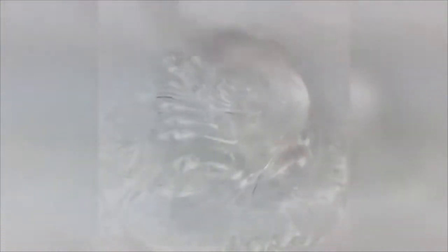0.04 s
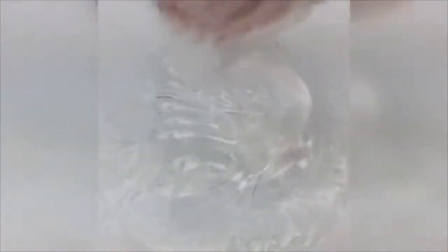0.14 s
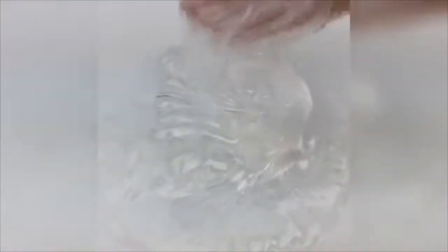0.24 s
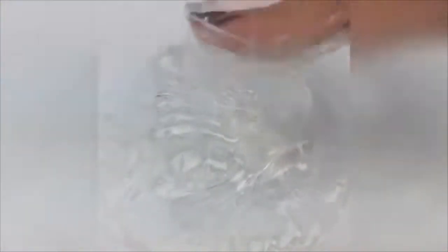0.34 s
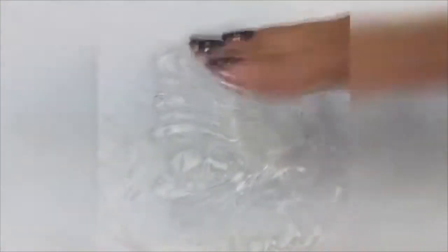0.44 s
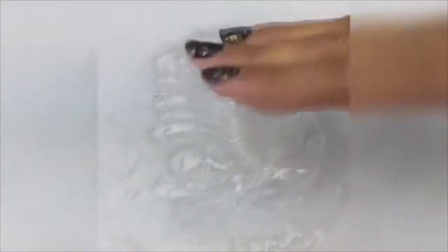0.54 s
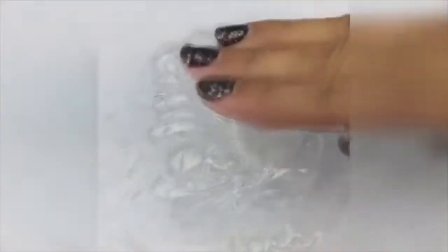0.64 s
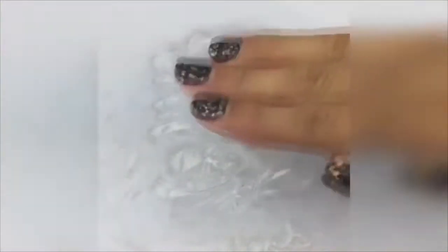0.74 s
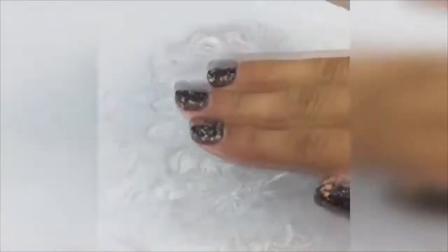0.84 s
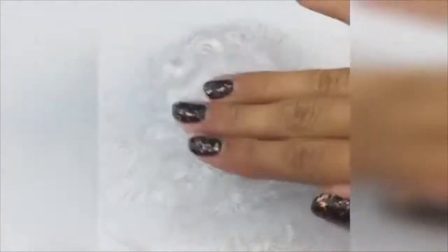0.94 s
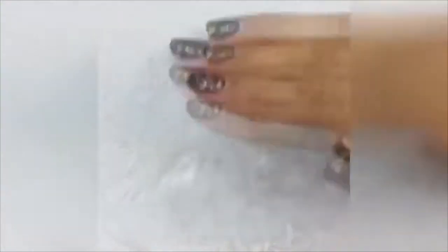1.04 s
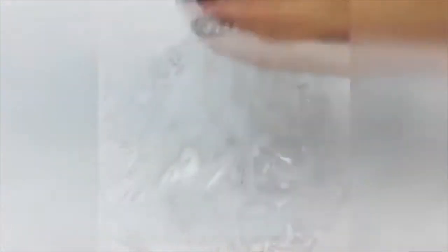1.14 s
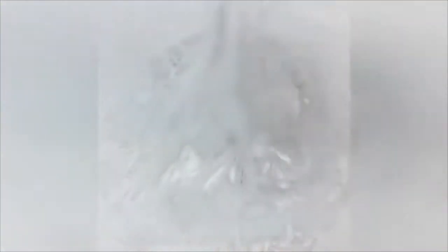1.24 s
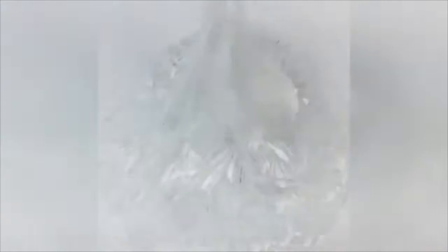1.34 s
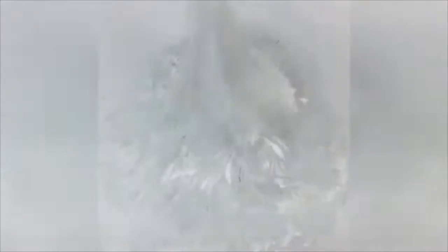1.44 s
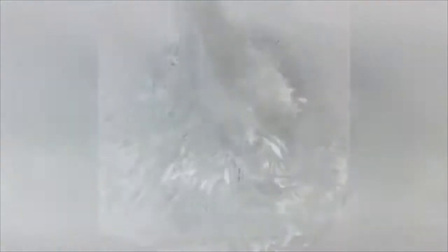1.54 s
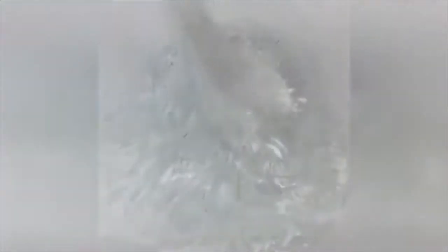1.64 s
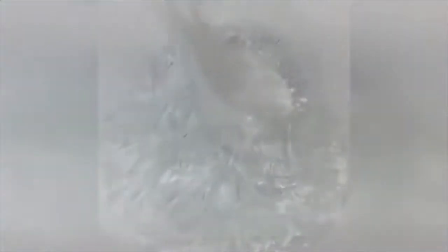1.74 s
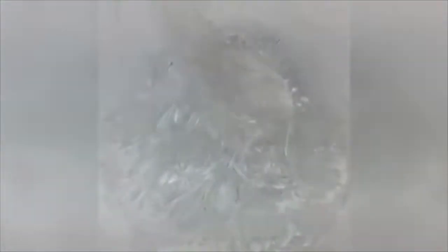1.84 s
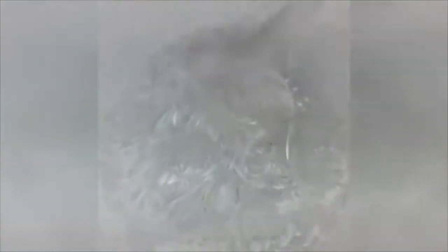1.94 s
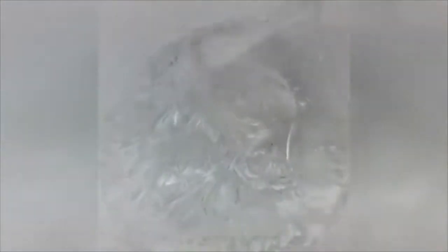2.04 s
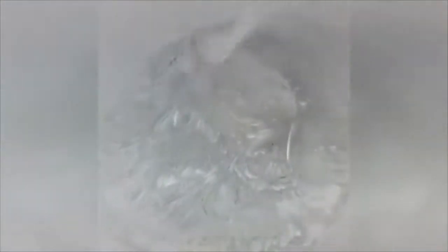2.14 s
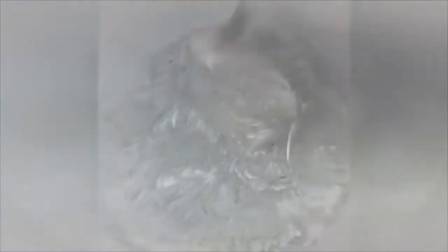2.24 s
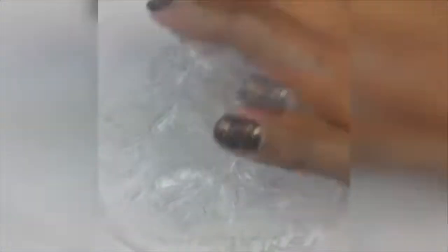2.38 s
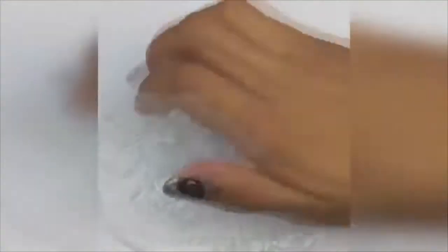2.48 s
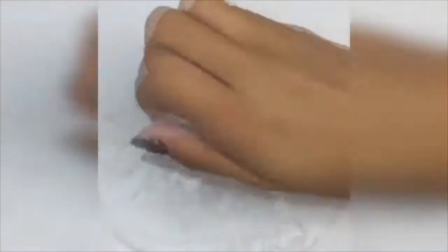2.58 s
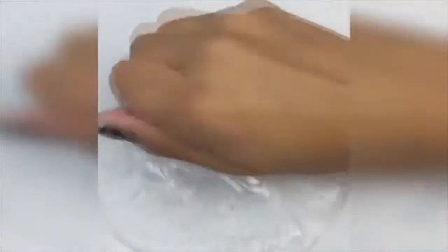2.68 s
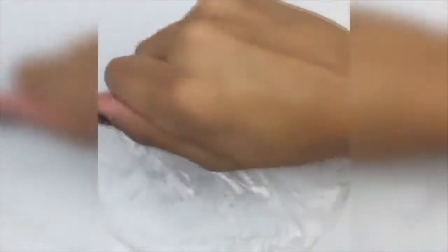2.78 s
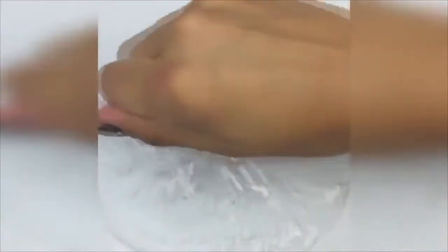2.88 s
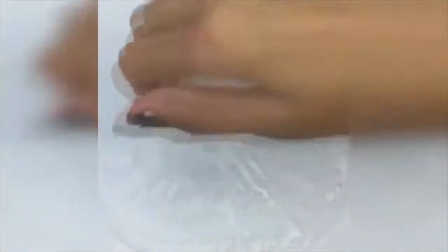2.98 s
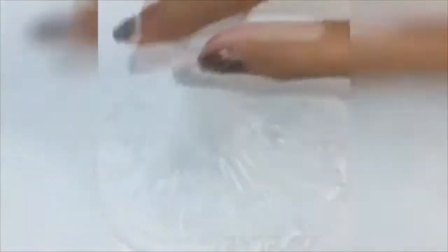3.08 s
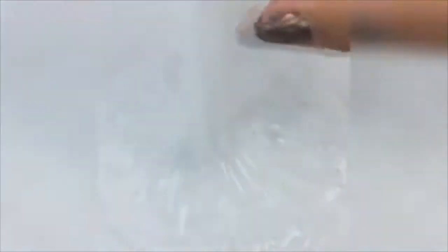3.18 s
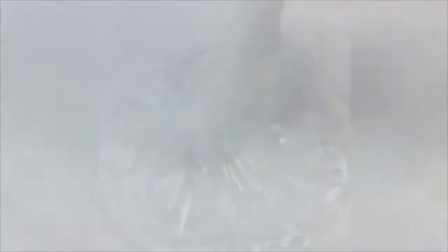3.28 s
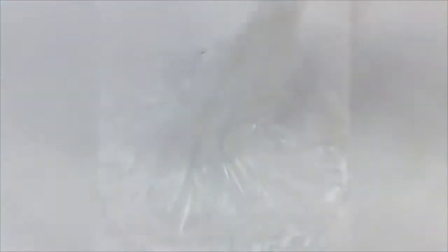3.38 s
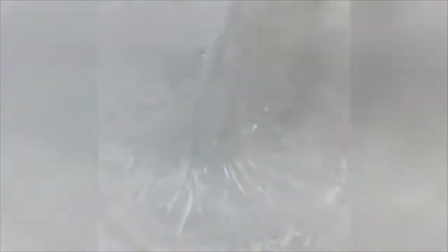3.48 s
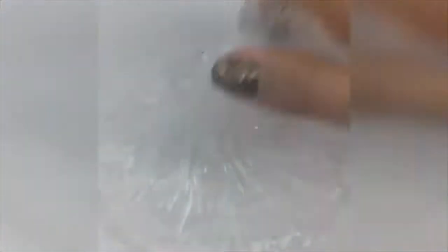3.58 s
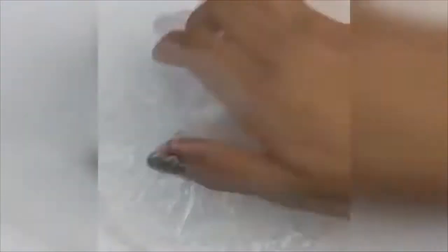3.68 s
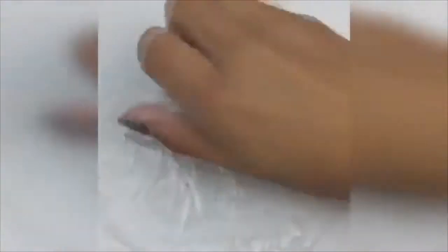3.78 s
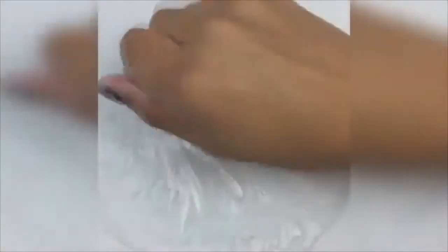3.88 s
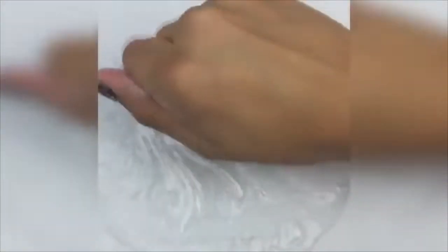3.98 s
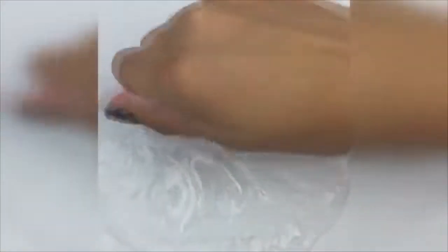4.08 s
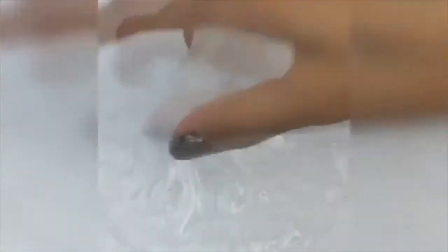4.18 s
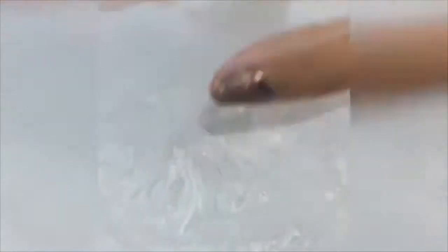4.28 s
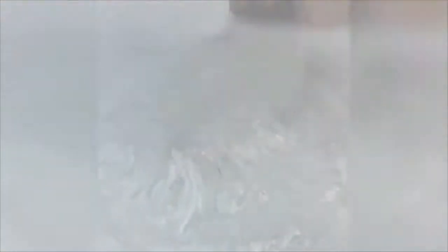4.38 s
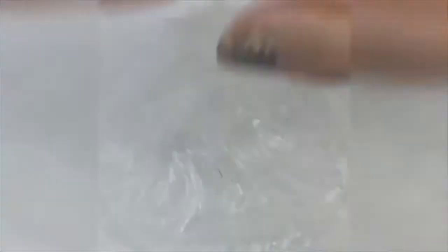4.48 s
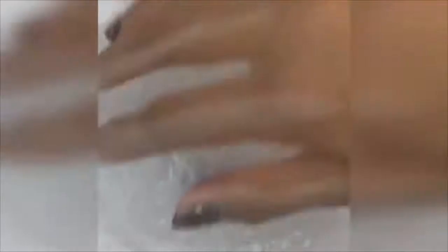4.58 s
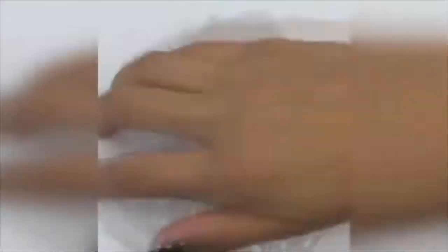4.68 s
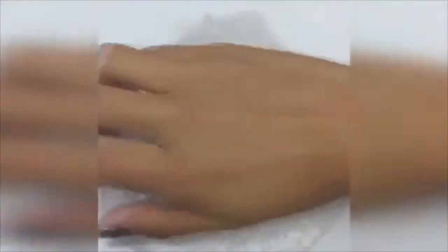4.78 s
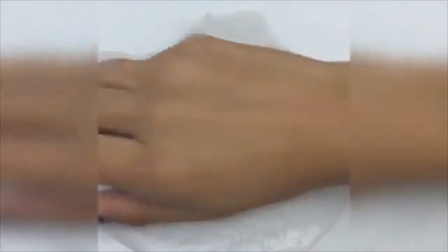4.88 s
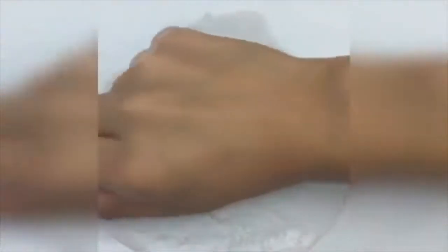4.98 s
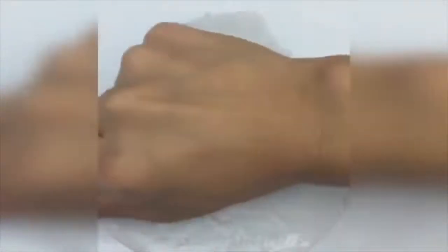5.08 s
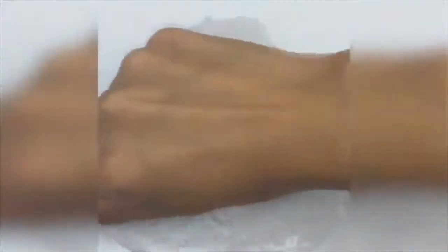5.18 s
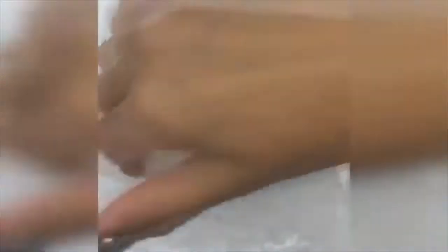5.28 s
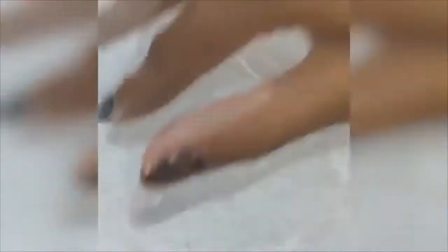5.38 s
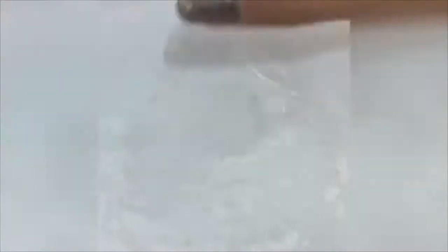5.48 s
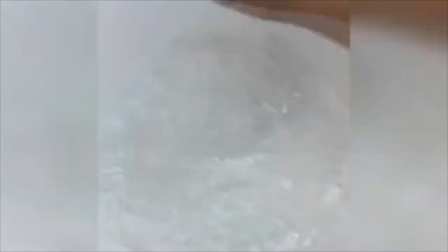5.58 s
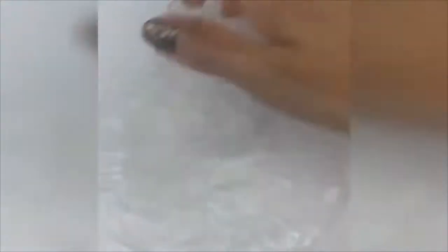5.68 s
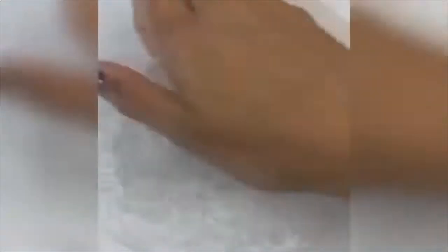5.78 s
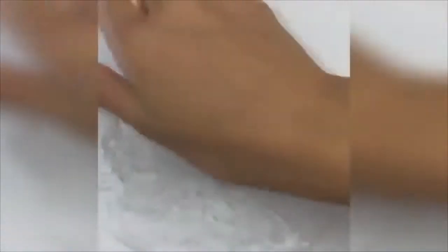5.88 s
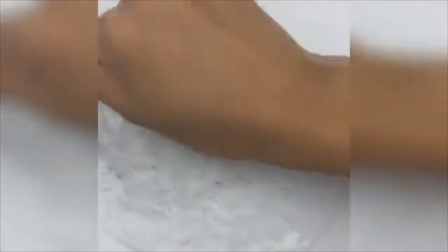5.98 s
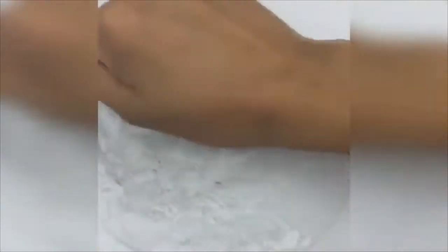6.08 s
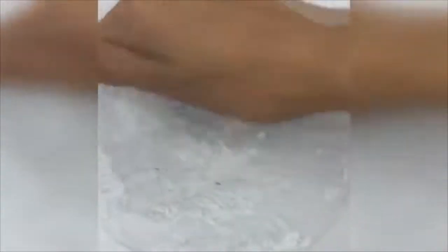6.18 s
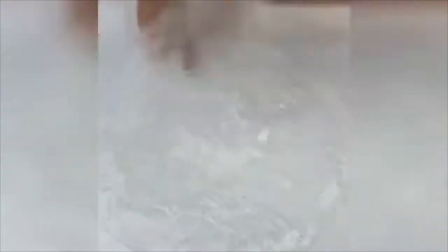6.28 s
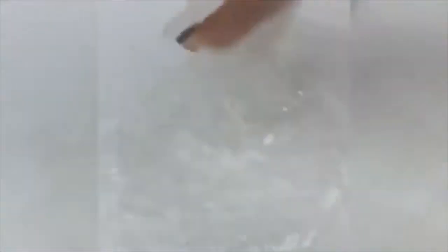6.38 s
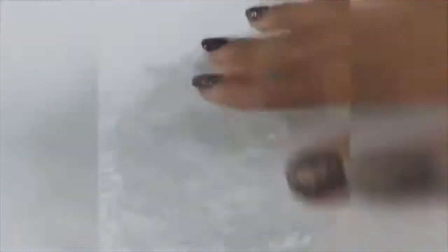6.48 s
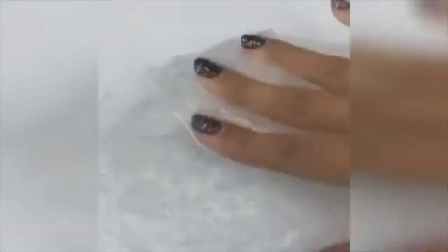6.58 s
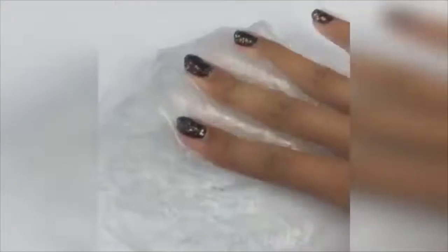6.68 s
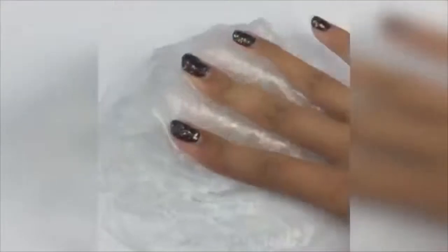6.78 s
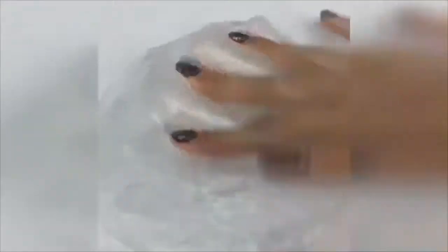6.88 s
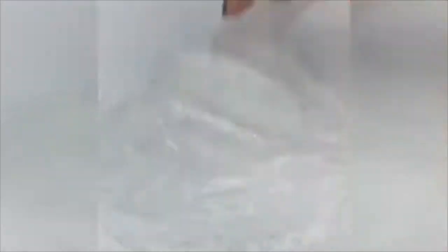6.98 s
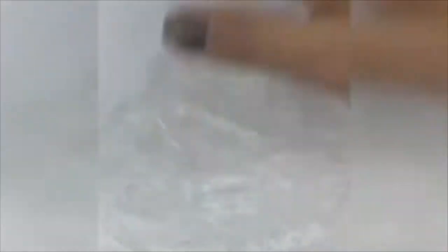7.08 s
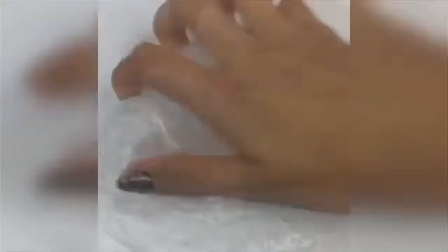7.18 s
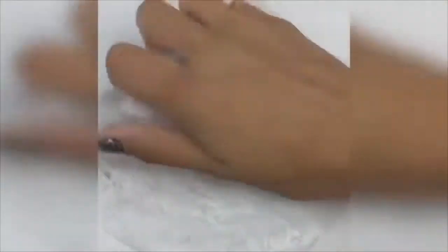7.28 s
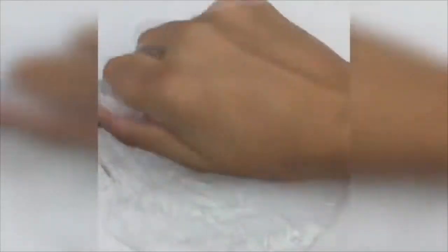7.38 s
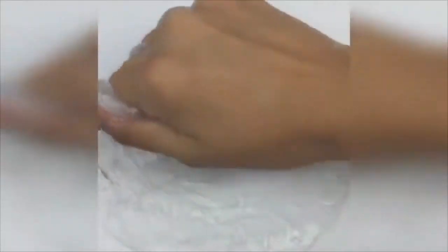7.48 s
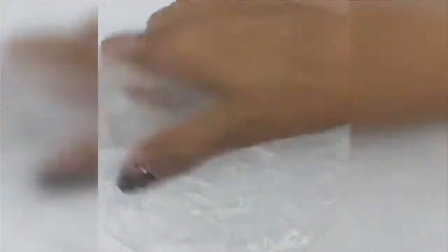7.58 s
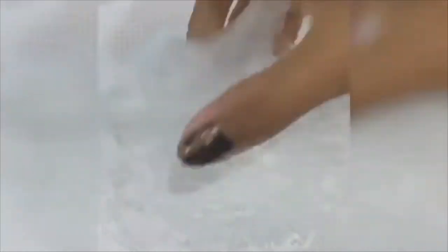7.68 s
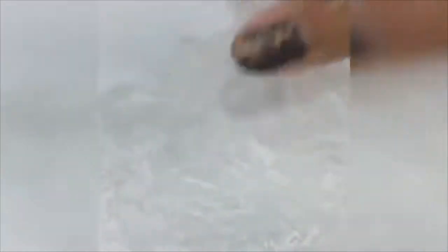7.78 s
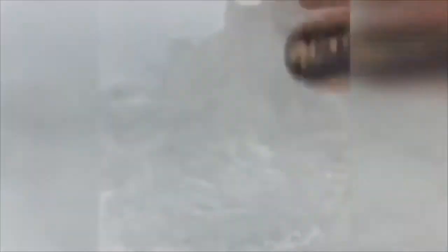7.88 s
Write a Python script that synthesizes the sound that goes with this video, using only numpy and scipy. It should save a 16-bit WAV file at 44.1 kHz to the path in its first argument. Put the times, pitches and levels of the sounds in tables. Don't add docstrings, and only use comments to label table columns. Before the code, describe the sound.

Very close to a phone microphone in a small quiet room, hands work wet slime. It begins almost silent with low hum and tiny ticks, then a sudden cluster of sharp pops and dense sticky crackle breaks out near three seconds. Further uneven bursts follow, with brief gulps, squelches and soft low table booms, ending with one loud ringing pop and fading crackle.

```python
import sys
import numpy as np
from scipy import signal
from scipy.io import wavfile
from scipy.ndimage import uniform_filter1d

SR = 44100
rng = np.random.default_rng(int(sys.argv[2]) if len(sys.argv) > 2 else 0)


def magnitude_from_level(level_db):
    exponent = np.asarray(level_db, float) / 20
    return 10 ** exponent


def wrap_up_sound(samples):
    columns = np.atleast_2d(samples).T
    tamed = np.clip(columns, -1, 1)
    steps = np.round(tamed * 32767).astype(np.int16)
    wavfile.write(sys.argv[1], SR, steps)


N = 349838

# (pitch [Hz], level [dB])
HUM_COLOUR = [(12, -68), (20, -39), (43, -10), (62, -8), (87, -10.5), (124, 0), (164, -12), (205, -12.5),
              (377, -21.5), (409, -25.5), (587, -28.5), (1930, -31.5), (2690, -31.5), (12700, -39.5),
              (15000, -48)]
# (time [s], level [dB], pitch [Hz])
BLISTERS = [(0.048, -42.5, 3200), (0.711, -57, 4000), (1.2695, -42, 870), (1.3284, -48, 3150),
            (1.37, -42, 2150), (1.3864, -46, 4570), (1.4192, -45, 1860), (1.4372, -43.5, 3800),
            (1.628, -52, 6300), (1.7182, -52.5, 8600), (1.82, -55, 9100), (1.8504, -51, 7800),
            (1.8752, -44.5, 8700), (1.9017, -47, 10100), (2.4339, -60, 8000), (2.5085, -57, 8540),
            (2.661, -54.5, 990), (2.6872, -41.5, 5250), (3.382, -39.5, 2390), (3.567, -41.5, 6000),
            (3.6178, -47, 11880), (3.896, -43.5, 1950), (4.9035, -48, 6260), (5.0387, -54, 2420),
            (6.5737, -46, 10940), (6.7658, -46.5, 9900), (6.7923, -53.5, 662), (6.8437, -51.5, 3950),
            (6.9277, -43, 2020), (7.235, -48.5, 4130), (2.55, -59.5, 6000), (2.728, -49, 8000),
            (2.787, -43, 11000), (2.7995, -35, 9000), (2.856, -31.5, 10960), (4.118, -30.5, 1240),
            (4.185, -43, 11000), (4.2055, -40, 2400), (4.323, -35.5, 6350), (7.459, -43, 8460),
            (7.497, -42, 9000), (7.745, -47, 3200), (7.768, -36, 8000)]
# (time [s], level [dB], pitch [Hz], tearing time [ms])
LARGE_POCKETS = [(1.2248, -27.5, 2460, 4.8), (2.6937, -35.5, 2230, 5.5), (2.8032, -21, 1980, 6.9),
                 (2.8384, -19.5, 1850, 11), (3.0128, -17.5, 2760, 2.7), (3.1022, -32, 1480, 29),
                 (3.9947, -16.5, 1800, 6), (4.0071, -13.5, 1680, 2.6), (4.0128, -16, 1520, 1.8),
                 (4.0731, -20, 2140, 3.4), (4.091, -24, 2320, 3.8), (4.109, -26, 2200, 7.6),
                 (4.3111, -31.5, 3360, 13), (5.1604, -20.5, 2170, 3.5), (5.2113, -20.5, 2010, 4.3),
                 (5.4404, -22.5, 2120, 5.9), (5.5685, -34.5, 1192, 5.5), (5.886, -30.5, 2300, 4.2),
                 (5.9195, -29.5, 2350, 5.7), (6.1286, -35, 2940, 2.7), (6.4118, -17, 2550, 4.7),
                 (7.1458, -40.5, 2520, 8.9), (7.3342, -22.5, 2500, 4.1), (7.3516, -28, 2700, 9.1),
                 (7.385, -22.5, 2380, 4.9), (7.5186, -30.5, 2080, 6.2), (7.527, -23, 1620, 3.8),
                 (2.7339, -35, 2340, 8), (5.9, -29, 2180, 4.8)]
# (time [s], level [dB], pitch [Hz], tearing time [ms])
SMALL_POCKETS = [(1.2061, -34.5, 5560, 3.2), (2.774, -36, 5440, 5.2), (2.8211, -23.5, 6730, 0.48),
                 (2.8642, -17, 9600, 7), (2.886, -3, 5900, 2.1), (2.906, -13, 6110, 2.7),
                 (2.9118, -2.5, 6204, 5.2), (2.9579, -11, 12420, 2.5), (6.238, -8.5, 2770, 3.2),
                 (2.9988, -15.5, 6330, 11.7), (3.1901, -25, 6330, 12), (3.2836, -41.5, 7810, 2.6),
                 (3.3527, -39, 6610, 15), (3.4899, -40, 11000, 4), (4.0598, -27, 6190, 7.1),
                 (4.1645, -27.5, 4000, 5.7), (4.2157, -30, 6900, 0.73), (4.4285, -32.5, 12200, 2.8),
                 (4.454, -34.5, 7000, 4.2), (5.0581, -35, 11900, 8.8), (5.2416, -7, 6200, 3.1),
                 (6.1103, -37.5, 8700, 4.2), (6.1787, -17.5, 8310, 5), (6.237, -3.5, 5930, 6.1),
                 (7.0049, -43.5, 11100, 7.7), (7.427, -33.5, 4530, 11.6)]
# (time [s], level [dB], pitch [Hz], tearing time [ms])
RINGING_POCKETS = [(7.5943, -1.5, 2860, 2.7), (2.749, -34.5, 5440, 2.5), (2.894, -12.5, 685.5, 4.9),
                   (2.9346, -18, 10300, 7.7), (3.0776, -32.5, 6370, 5.6), (3.4123, -33, 9260, 20),
                   (3.5013, -42.5, 5130, 4.5), (3.5102, -28.5, 8360, 8.2), (4.041, -26, 1880, 6.3),
                   (4.1, -21, 9150, 8.6), (4.2092, -22, 2170, 3.9), (4.9945, -36, 2300, 2.3),
                   (5.1796, -28, 9350, 2.6), (5.2244, -34.5, 7990, 2.5), (5.237, -14, 5110, 2.2),
                   (5.4144, -30, 5510, 4.8), (5.5435, -35.5, 8500, 3.8), (7.5975, -0.5, 2425, 2.8),
                   (6.1556, -30, 8720, 7.5), (6.1689, -12, 3730, 7.3), (6.1862, -9, 3900, 6),
                   (6.2502, -24.5, 8950, 2.8), (6.4374, -20.5, 11530, 2.5), (6.4583, -31, 9960, 10.2),
                   (6.536, -38.5, 9740, 6.6), (6.884, -38.5, 10170, 0.84), (7.0935, -23.5, 6400, 13),
                   (7.1054, -25, 11860, 4), (7.5066, -25.5, 9690, 1.1), (7.6135, -16.5, 11700, 8.5)]
# (time [s], level [dB], pitch [Hz])
CRACKS = [(1.2043, -37.5, 2490), (1.4258, -45.5, 1820), (2.8857, -20.5, 930), (2.8962, -21, 1770),
          (3.485, -39, 2840), (4.0494, -30, 1386), (4.4529, -45, 1690), (6.1787, -32.5, 1378),
          (5.2605, -18.5, 2320), (5.4401, -29.5, 1180), (5.515, -35.5, 1910), (6.197, -30, 3510),
          (6.2374, -24.5, 987), (6.5152, -39, 685), (6.926, -49, 730), (7.0046, -43, 2620),
          (7.1585, -35, 1800), (7.3518, -33.5, 2740),
          (1.2689, -48.5, 12060), (1.439, -48.5, 8550), (1.8832, -55, 9170), (7.0997, -24, 6570),
               (2.734, -39.5, 9320), (2.749, -39.5, 11370), (2.8203, -35.5, 8680), (2.8382, -17, 9050),
               (2.8707, -19, 9500), (2.9209, -14, 12230), (2.9438, -23, 12270), (2.9715, -26, 5120),
               (2.9987, -14, 6600), (3.218, -39, 5200), (3.4193, -35, 4000), (3.5093, -36.5, 7920),
               (3.9944, -23.5, 12070), (7.0945, -17.5, 9000), (4.0907, -27.5, 8620), (4.1358, -27.5, 4000),
               (4.1453, -33, 7490), (4.3706, -32, 5740), (4.5257, -49, 11670), (4.5364, -42.5, 12960),
               (4.9941, -48.5, 11400), (5.1091, -49.5, 12400), (5.1595, -25.5, 8600), (5.2115, -22, 6006),
               (5.2263, -31, 9040), (5.2531, -21, 5430), (5.4613, -29, 6800), (5.5731, -43.5, 5444),
               (6.163, -25.5, 7600), (6.2438, -20, 5980), (6.2503, -18.5, 11760), (6.3775, -42.5, 9470),
               (6.4042, -38, 4440), (6.4379, -20.5, 7980), (6.505, -38, 10000), (2.8657, -13.5, 9010),
               (7.1055, -22.5, 8230), (7.1308, -35, 6200), (7.4261, -38.5, 8010), (7.8035, -39, 5770),
               (7.8691, -31, 11350), (7.9065, -46.5, 9220)]
# (pitch [Hz], level [dB])
SNAP_COLOUR = [(88, -43), (150, -20.5), (701, -4.5), (1200, -7.5), (2360, -3), (3030, -9.5), (6420, -8.5),
               (13400, -14.5), (15000, -14)]
# (pitch [Hz], time [s])
ECHO_TIME = [(600, 0.16), (1200, 0.16), (3000, 0.21), (7000, 0.21), (13000, 0.14)]
# (time [s], peak level [dB], pitch [Hz], length [ms])
GULPS = [(0.708, -52.5, 603, 5.6), (1.204, -31, 880, 1.6), (2.692, -33.5, 990, 4.7),
         (2.879, -21, 340.5, 6.2), (2.893, -14, 650, 2.6), (2.91, -16.5, 693.5, 7.1),
         (2.912, -14.5, 380.6, 7.7), (3.994, -16.5, 904, 3.7), (4.31, -35, 670, 13), (5.257, -13, 610, 9.6),
         (6.235, -27, 930, 2.1), (6.41, -26.5, 590, 6.8), (6.529, -43, 663, 18), (7.151, -33.5, 650, 13.4),
         (7.593, -15.5, 402, 5.3), (7.758, -40.5, 560, 8.5)]
# (middle time [s], level [dB], pocket pitch [Hz], length [ms], sharpness of the pocket [ratio])
SQUELCHES = [(1.222, -53, 337, 30, 2.7), (1.31, -53, 3900, 8, 3), (1.422, -49, 1770, 12, 5.9),
             (1.44, -53, 2300, 10, 2.7), (2.925, -26.5, 1580, 30, 3.4), (2.96, -30.5, 1460, 35, 1.4),
             (4.194, -46, 814, 10, 3), (3.146, -33, 2830, 14.8, 2.4), (3.168, -37, 2700, 14, 2.8),
             (3.237, -43, 1900, 14, 3), (3.42, -45, 3600, 28, 1.8), (3.511, -41.5, 1600, 13.4, 5.6),
             (4.28, -48, 3320, 60, 11), (4.31, -44, 350, 53, 1.2), (4.54, -53.5, 1890, 43, 4),
             (4.54, -48, 11500, 48, 1.6), (5.262, -26.5, 2230, 11.5, 4.3), (5.285, -43, 1130, 59, 7.8),
             (5.31, -47.5, 555, 32, 5.4), (5.342, -54, 663, 58, 13), (5.376, -53, 615, 45, 12),
             (5.456, -35, 1450, 13.2, 3.7), (5.464, -33, 2500, 14, 6.6), (6.401, -39.5, 3500, 25, 1.5),
             (7.175, -48, 269, 30, 3), (3.17, -42.5, 554, 85, 0.76), (7.44, -54, 650, 26, 3),
             (7.568, -33, 1820, 13, 1.4), (7.572, -28, 11800, 20, 1.9), (7.596, -10.5, 6050, 8.3, 0.83),
             (7.596, -11.5, 4100, 7.2, 6.2), (7.612, -27, 5460, 36, 1.3), (7.76, -40.5, 2750, 39, 3.4),
             (7.8, -38.5, 6030, 24, 2.8), (7.863, -41, 3500, 14.4, 1.4), (0.712, -54.5, 4000, 6.9, 11),
             (6.423, -32.5, 2670, 10, 4), (5.165, -39, 1390, 12, 1.4), (7.533, -33, 4970, 17, 0.81),
             (7.15, -42, 12000, 35, 1.5)]
# (middle time [s], peak level [dB], pitch [Hz], length [ms])
SWAYS = [(3.27, -42.5, 65.4, 72), (3.981, -44, 56.3, 98), (4.38, -49, 48.3, 220), (4.721, -44, 54, 230),
         (4.93, -42, 51.8, 150), (5.271, -46.5, 56.8, 350), (5.531, -44, 49.8, 160),
         (5.809, -45, 57.4, 230), (6.2, -49, 64.1, 90), (6.35, -49, 52.7, 110), (6.471, -45.5, 50, 210),
         (6.84, -48.5, 53.4, 130), (7.19, -44, 54, 95), (7.461, -41.5, 56.2, 220), (7.85, -47.5, 50.1, 180),
         (3.48, -53, 60.9, 127), (4.15, -54.5, 60.2, 120), (4.54, -53.5, 64.8, 87), (5.05, -52.5, 62, 96),
         (5.95, -52.5, 66, 110), (7.06, -60, 66, 180), (7.65, -51, 60, 120)]
# (middle time [s], peak level [dB], pitch [Hz], length [ms], level of the upper tones [dB])
BOOMS = [(2.901, -43, 136, 110, 2), (3.197, -42, 105.2, 148, -4), (3.449, -54, 105.3, 117, -2.5),
         (4.03, -49, 119.7, 75, -9), (4.091, -41, 100.6, 44, -6), (4.342, -44.5, 111.7, 204, -6.5),
         (4.897, -32.5, 116.3, 33, -26.5), (5.441, -45.5, 93.5, 79, -1.5), (5.576, -40.5, 139, 98, -11.5),
         (5.903, -42.5, 133, 79, -0.5), (6.188, -45.5, 117.4, 130, -6), (6.259, -43, 111, 78, -30),
         (6.445, -33.5, 108, 89, -11.5), (6.81, -38, 101, 44.5, -16), (7.118, -31.5, 117, 64, -3.5),
         (7.164, -33, 105.4, 66, -7), (7.351, -33, 117.5, 48, -3), (7.396, -32.5, 109.3, 123, -6),
         (7.6, -38.5, 126.3, 57, -5), (7.817, -42.5, 102.3, 104, -4.5), (7.901, -44, 112.3, 124, -9),
         (0.985, -54, 137, 75, -22), (1.28, -57, 166.1, 78, -2), (7.271, -60.5, 131.2, 68, -17),
         (7.447, -37, 120, 48, -12)]
# (pitch over the lowest [ratio], level [dB])
UPPER_TONES = [(1.4, 0.5), (1.748, -7.5), (2.3, -5), (3.1, -12)]
# (fullest time [s], level [dB], time to swell 20 dB [ms], time to fade 20 dB [ms])
THICK_FILM = [(1.428, -52, 28, 16), (1.235, -41, 32, 18), (1.3, -59.5, 70, 200), (2.87, -23.5, 36, 105),
              (3.07, -49.5, 95.5, 208.5), (4.005, -36.5, 18, 325.5), (4.31, -37, 95, 175),
              (5.01, -57.5, 32, 260), (5.258, -30.5, 45.5, 36), (5.448, -35, 65, 95.5),
              (5.572, -48, 110, 20), (5.896, -55, 32, 118), (6.115, -51, 29, 205), (6.93, -61, 58, 67),
              (7.152, -38.5, 77, 23), (7.345, -51.5, 25, 301), (7.56, -42, 69, 80), (7.599, -35, 40, 137),
              (7.76, -50, 87, 82)]
# (fullest time [s], level [dB], time to swell 20 dB [ms], time to fade 20 dB [ms])
THIN_FILM = [(1.881, -60, 79, 49), (2.916, -31, 151, 152), (3.191, -35.5, 183, 161), (3.417, -40.5, 43, 58),
             (3.518, -45, 161, 65), (3.975, -49, 17, 12), (4.18, -50, 202.5, 148), (4.385, -48, 154.5, 71),
             (4.545, -53, 35, 27), (5.13, -54, 202, 120), (6.175, -30.5, 20.5, 81), (6.242, -32, 5.5, 103),
             (6.405, -36.5, 49, 141), (6.53, -45, 198, 38), (7.098, -42, 39, 74), (7.48, -59.5, 198, 102),
             (7.529, -44, 32, 105), (7.8, -38, 120, 55), (7.868, -36.5, 46, 16), (7.925, -46, 98, 100)]
# (pitch [Hz], level [dB])
PEEL_COLOUR = [(150, -45.5), (250, -5.5), (364, -4), (404, -4), (1090, 0.5), (1430, 1.5), (2850, -0.5),
               (11400, -7), (13500, -4), (15000, -30)]


def evened(x):
    return x / np.sqrt(np.mean(x ** 2) + 1e-20)


def loudest(x):
    return np.sqrt(uniform_filter1d(x ** 2, 44).max())


def read(points, hz):
    f, value = np.transpose(points)
    return np.interp(np.log(hz + 1), np.log(f + 1), value)


def add(mix, s, sound):
    part = mix[round(s * SR):][:len(sound)]
    part += sound[:len(part)]


def colour(x, points, size=2048):
    hz = abs(np.fft.fftfreq(size, 1 / SR))
    log_gain = np.log(magnitude_from_level(read(points, hz)))
    phase = -signal.hilbert(log_gain).imag
    taps = np.fft.ifft(np.exp(log_gain + 1j * phase)).real
    return signal.oaconvolve(x, taps[:size // 2])[:len(x)]


def resonate(x, hz, width_hz):
    r = np.exp(-np.pi * width_hz / SR)
    return 2 * signal.lfilter([1 - r], [1, -r * np.exp(2j * np.pi * hz / SR)], x).real


def hum():
    return magnitude_from_level(-61.5) * evened(colour(rng.standard_normal(N), HUM_COLOUR, size=8192))


def pop(db, hz, snap_db, tear_ms):
    t = np.arange(-132, 1400) / SR
    tear_s = max(tear_ms, 0.5) / 1000
    fade = 1 / (1 + (t / (0.55 * tear_s)) ** 3) + magnitude_from_level(-17) * np.exp(-t / (2.5 * tear_s))
    strength = np.where(t < 0, 0.45 * np.exp(t / 0.0012), fade)
    strength = strength * (1 + 1.3 * np.exp(-abs(t) / 0.00016))
    rips = rng.standard_normal(len(t))
    rips = rips * abs(rips) ** 0.7
    rip = evened(resonate(rips, hz, 3 * hz)) * strength + 7 * (t == 0)

    pocket = resonate(resonate(rip, hz, hz / 2.1), hz, hz / 2)
    snap = colour(rip, SNAP_COLOUR, size=512)
    wall = evened(resonate(rip, hz / 0.83, hz / 0.5))
    snap += 0.72 * wall * snap.std()

    share = magnitude_from_level(snap_db) ** 2
    both = np.sqrt(1 - share) * evened(pocket) + np.sqrt(share) * evened(snap)
    return t[0], magnitude_from_level(db) * both / loudest(both)


def bursts():
    blisters = [(*row, 5.5) for row in BLISTERS]
    cracks = [(*row, 0.24) for row in CRACKS]
    kinds = [(LARGE_POCKETS, -1.7), (SMALL_POCKETS, -1.96), (RINGING_POCKETS, -8.5),
             (blisters, -1.5), (cracks, -12)]
    out = np.zeros(N)
    for rows, snap_db in kinds:
        for s, db, hz, tear_ms in rows:
            lead_s, sound = pop(db, hz, snap_db, tear_ms)
            add(out, s + lead_s, sound)
    return out


def room(x):
    gap_s, turns_per_s = 0.0054, 2.1
    at = np.arange(round(gap_s * SR), SR // 2 - 12, 12)
    turn = np.pi * turns_per_s * np.arange(N) / SR
    out = np.zeros(N)
    for k in range(3):
        taps = np.zeros(SR // 2)
        taps[at + rng.integers(0, 12, len(at))] = rng.choice([-1., 1.], len(at))
        hz, t, z = signal.stft(taps, SR, nperseg=128)
        dying = magnitude_from_level(-60 * t / read(ECHO_TIME, hz)[:, None])
        tail = signal.istft(z * dying, SR, nperseg=128)[1]
        share = np.sqrt(2 / 3) * np.cos(turn + k * np.pi / 3)
        out += signal.oaconvolve(x * share, tail / np.linalg.norm(tail))[:N]
    return out


def gulp(s, db, hz, length_ms):
    u = np.linspace(0, 2, round(2 * max(length_ms, 2) * SR / 1000))
    turns = np.cumsum(hz * (1 + 0.06 * (u - 0.4))) / SR
    swell = np.e * 3 * u * np.exp(-3 * u - u ** 2)
    return s, magnitude_from_level(db) * swell * np.sin(2 * np.pi * turns)


def squelch(s, db, hz, length_ms, sharp):
    u = np.linspace(-1, 1, round(length_ms * SR / 1000))
    air, flutter = rng.standard_normal((2, len(u)))
    width_hz = hz / max(sharp, 1)
    band = resonate(resonate(air, hz, width_hz), hz * 1.038, width_hz)
    ragged = magnitude_from_level(2.5 * evened(uniform_filter1d(flutter, 90)))
    swell = np.cos(np.pi * u / 2) ** 2
    return s - len(u) / SR / 2, magnitude_from_level(db) * evened(band * ragged) * swell


def shake(s, db, hz, length_ms, upper_db=-99):
    t = np.arange(round(1.6 * length_ms * SR / 1000)) / SR

    def waver():
        start, phase, speed = rng.random(3)
        return 2 * np.pi * start + 0.45 * np.sin(2 * np.pi * (phase + (7 + 9 * speed) * t))

    tone = np.sin(2 * np.pi * hz * t + waver())
    for ratio, tone_db in UPPER_TONES:
        tone += magnitude_from_level(upper_db + tone_db) * np.sin(2 * np.pi * hz * ratio * t + 4 * waver())
    swell = np.hanning(len(t))
    return s - t[-1] / 2, magnitude_from_level(db) * tone * (0.8 * swell ** 2.5 + 0.2 * swell)


def table():
    out = np.zeros(N)
    for row in SWAYS + BOOMS:
        add(out, *shake(*row))
    return out


def pulls(rows):
    t = np.arange(0, N, 32) / SR
    power = np.full(len(t), 1e-12)
    for s, db, swell_ms, fade_ms in rows:
        away = 1000 * np.where(t < s, (s - t) / swell_ms, (t - s) / fade_ms)
        power += magnitude_from_level(db - 20 * away ** 1.55) ** 2
    return np.repeat(power, 32)[:N]


def peel():
    threads_per_s, spread_db, patch_db, clump_db = 12000, 2.3, 5, 2.1
    thick_tilt_db, thin_tilt_db = 0, 3
    thick, thin = pulls(THICK_FILM), pulls(THIN_FILM)
    tilt_db = (thick_tilt_db * thick + thin_tilt_db * thin) / (thick + thin)

    pitches_hz = np.geomspace(400, 13500, num=9)
    drift = uniform_filter1d(rng.standard_normal((N // 64 + 1, 10)), 16, axis=0)
    drift = drift.repeat(64, axis=0)[:N].T
    when, size, kind, sign = rng.random((4, N))
    ticks = (when < threads_per_s / SR) * np.sign(sign - 0.5)
    ticks = ticks * magnitude_from_level(clump_db * evened(drift[-1]) - spread_db * np.log(size + 0.0037))
    which = (kind * len(pitches_hz)).astype(int)

    grains = np.zeros(N)
    for k, hz in enumerate(pitches_hz):
        snaps = ticks * (which == k) * magnitude_from_level(patch_db * evened(drift[k]))
        ringing = evened(resonate(resonate(snaps, hz, hz / 2), hz, hz))
        grains += ringing * np.sqrt(hz) * magnitude_from_level(tilt_db * np.log2(hz / 4000))
    grains = colour(grains, PEEL_COLOUR)
    steady = grains / np.sqrt(uniform_filter1d(grains ** 2, 4000))
    return np.sqrt(thick + thin) * steady


def scene():
    slime = bursts() + peel()
    for row in GULPS:
        add(slime, *gulp(*row))
    for row in SQUELCHES:
        add(slime, *squelch(*row))
    no_bass = signal.butter(2, 200, "high", fs=SR, output="sos")
    slime = signal.sosfilt(no_bass, slime)
    return (slime + magnitude_from_level(-13.5) * room(slime) + table() + hum())[None]


def roll_off(x):
    return signal.sosfilt(signal.butter(12, 15140, fs=SR, output="sos"), x)


def record(dry):
    held = np.tanh(dry / 1.2) * 0.98
    low_pass = signal.firwin(201, 14250, window=("kaiser", 6), fs=SR)
    cut = signal.oaconvolve(held, low_pass[None], "same")
    mix = cut + magnitude_from_level(-31) * (held - cut)
    return roll_off(mix)


dry = scene()
out = record(dry)
wrap_up_sound(out)
```